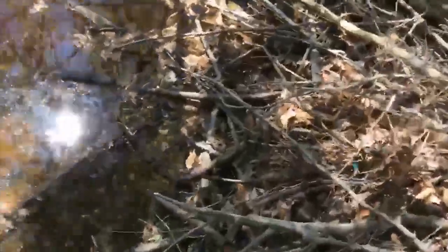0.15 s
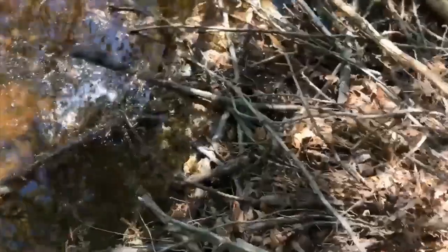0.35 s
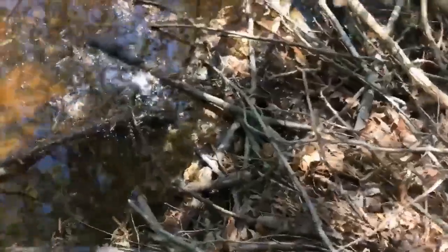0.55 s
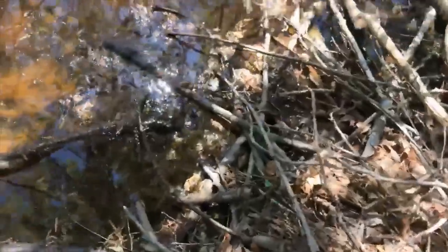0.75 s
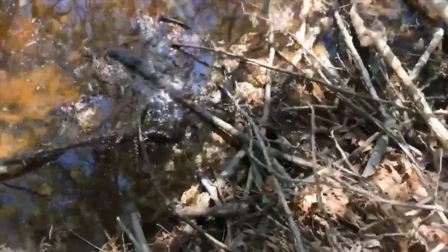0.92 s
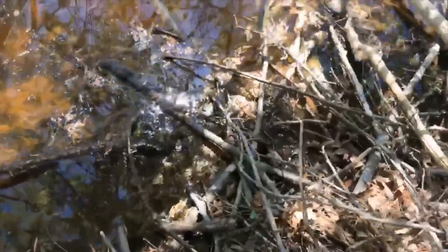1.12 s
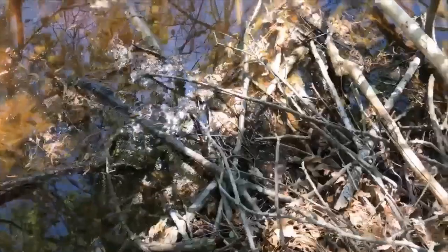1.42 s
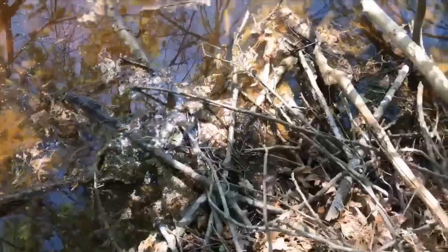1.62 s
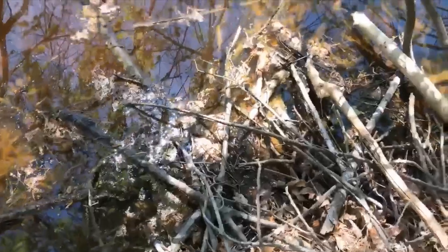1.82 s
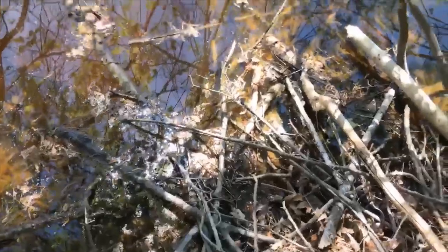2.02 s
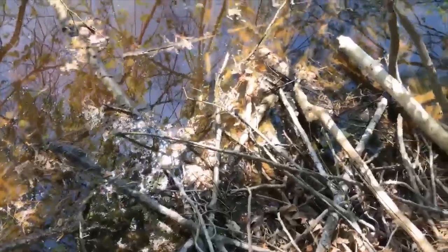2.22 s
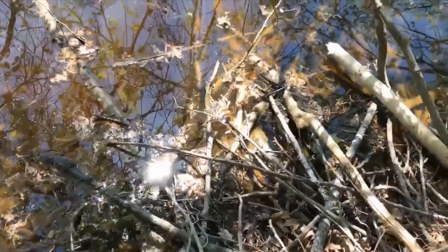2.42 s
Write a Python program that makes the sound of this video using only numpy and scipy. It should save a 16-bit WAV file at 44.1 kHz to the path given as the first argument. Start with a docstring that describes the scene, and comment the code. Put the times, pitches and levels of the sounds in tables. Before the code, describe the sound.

A footstep crushes dry leaves and twigs in one long, bright, crackling crunch with two hard snaps, then faint rustling and scattered ticks fade out on a quiet stream bank; close mono microphone, low distant rumble beneath.

```python
"""On a stream bank, a foot presses into dry leaves and twigs: one long crunch, then the litter shifts and settles.
Leaves crackle as dense random impulses exciting damped resonators; tears and rubbing are modulated noise.
Twigs snap as damped sines with a noise crack; thicker sticks knock as two damped modes with a scuff.
A low far rumble of filtered noise lies underneath. Mono microphone."""
import sys
import numpy as np
from scipy import signal
from scipy.fft import rfft, irfft
from scipy.io import wavfile

SR = 44100
rng = np.random.default_rng(int(sys.argv[2]) if len(sys.argv) > 2 else 0)


def to_wav(sig):
    """Store sig (one row per channel, or 1-D mono) as 16-bit WAV at the path in sys.argv[1].

    Samples outside -1..1 are clipped; the rate is SR.
    """
    pcm = np.clip(np.atleast_2d(sig), -1, 1) * 32767
    pcm = np.round(pcm).astype(np.int16)
    wavfile.write(sys.argv[1], SR, pcm.T)  # frames by channels


N = 112454

# Rustle over time, level and treble tilt: [t/s, gain level/dB, tilt/(dB per octave)]
RUSTLE_LEVEL = [(0.0, -48.5, 1), (0.065, -56, 3.5), (0.075, -70, 13), (0.095, -70.5, 5), (0.109, -34.5, 0),
                (0.16, -38, 1.5), (0.18, -31.5, 0), (0.29, -33.5, 0.5), (0.4, -32, 0.5), (0.5, -34.5, -0.5),
                (0.55, -34, 1), (0.59, -38, -1.5), (0.635, -38, 1), (0.691, -32.5, 1), (0.76, -36.5, 1),
                (0.81, -42, 0), (0.851, -56, 2), (0.9, -54.5, -1), (0.96, -51, 1.5), (1.2, -49.5, 0),
                (1.3, -45, 0), (1.43, -48.5, -1), (1.48, -55, -0.5), (1.52, -49, 3), (1.62, -57, 0),
                (1.8, -48, -2), (1.93, -56.5, -0.5), (1.97, -66, -0.5), (2.015, -58.5, -2.5),
                (2.035, -44.5, 1.5), (2.06, -61, -2), (2.09, -53, -0.5), (2.14, -67.5, 0), (2.35, -72, -6),
                (2.38, -76, -4), (2.47, -67, -6.5), (2.55, -75, -2)]
# Snaps of twigs and stiff leaves:
# [t/s, level/dB, f/Hz, ring/cycles to -60 dB, crack level/dB re ring, crack tilt/(dB per octave)]
TWIG_SNAPS = [(0.1091, -20.5, 6500, 17, -5.5, -1), (0.1273, -18, 3870, 13.5, -7, -0.5),
              (0.1798, -22, 4300, 12.5, -11, 0), (.2174, -23, 6600, 14, -12, 2),
              (0.2566, -17, 4160, 12, -7, -3), (.2664, -22, 6300, 15, -8, 3.5),
              (.3042, -18.5, 8600, 15, -6.5, 0), (.3486, -9.5, 6500, 11, -17, 3),
              (0.3612, -22, 8630, 14, -12, 4), (0.3712, -18, 8400, 15, -8, 4),
              (0.4057, -20.5, 4160, 15, -7, 0), (0.4246, -20.5, 4400, 12, -8, -1),
              (0.4365, -19, 2550, 13, -9, 0), (0.4436, -20.5, 4060, 10, -14, -2),
              (0.5134, -19.5, 4100, 13, -8, 0), (0.5466, -23, 4600, 12, -4, 3),
              (0.6072, -6, 4260, 6.5, -12.5, -2), (0.6141, -14.5, 8850, 20, -5.5, 2),
              (.6174, -22, 3240, 14, -4, 2), (.6604, -23, 5120, 10, -7.5, -2),
              (.7615, -23, 14500, 20, -5, 3), (0.8986, -32, 12500, 20, -6, 1.5),
              (0.9142, -36.5, 6000, 15, -7, 0), (0.9714, -38, 4100, 12, -8, 0),
              (1.069, -29.5, 12600, 19, -6, 1.5), (1.1478, -38.5, 3890, 9, -6, -3),
              (1.1872, -34.5, 4300, 9, -6, -3), (1.2024, -34.5, 5720, 12, -8, -2),
              (1.2825, -30.5, 4590, 16, -6, 1), (1.2934, -34, 6500, 14, -8, 0),
              (1.3244, -34, 8960, 14, -12, -1), (1.3484, -28, 8400, 13, -14, 3),
              (1.4272, -32, 4600, 12, -5, 3.5), (1.4484, -36, 4660, 11.5, -8, 3),
              (1.494, -38, 8480, 14, -8, 0), (1.5024, -33.5, 12800, 15, -8.5, 0),
              (1.5124, -36, 8000, 17, -10, -2.5), (1.6671, -37.5, 4640, 17, -7.5, 1),
              (1.7205, -37.5, 4740, 14, -9, 0), (1.7454, -42, 5170, 14, -8, 0),
              (1.7599, -36, 13000, 20, -5, 2), (1.7833, -22.5, 2280, 10, -13.5, -1.5),
              (1.789, -32, 6050, 14, -5, 1), (1.8174, -38, 5140, 14, -7, 0),
              (1.8262, -27.5, 5350, 17, -11.5, 3), (1.8344, -39, 3580, 14, -3, 0),
              (1.8464, -39, 5100, 14, -2, 5), (1.8814, -42, 6130, 13, -6, 0),
              (1.9006, -27, 5570, 19, -5.5, 0.5), (1.924, -43, 4550, 10, -8, 3),
              (1.942, -33, 14200, 25, -6.5, 2.5), (1.9839, -46, 3110, 12, -6, -1),
              (2.0009, -43, 2390, 11, -5.5, -2), (2.0692, -21, 10100, 25, -5, 1.5),
              (2.159, -48, 6490, 18, -7, 0), (2.1744, -50, 15000, 25, -8, 3),
              (2.1899, -53, 9000, 15, -3, 3), (2.2268, -47, 4840, 12, -2, 1),
              (2.2654, -56, 3190, 12, -8, 0), (2.2764, -55, 5970, 14, -6, 0), (2.2832, -50, 1960, 6, -4, 1),
              (2.2967, -48.5, 8740, 18, -4.5, 2), (2.3441, -45, 6030, 14, -3, 1.5),
              (2.4044, -46.5, 3080, 10, -8.5, -4.5), (2.4474, -42.5, 5000, 12, -9, -2),
              (2.4578, -32, 4640, 6.5, -11.5, -3), (2.4664, -52, 4390, 14, -4, 0),
              (2.5014, -53, 3000, 12, -5, 0), (2.5107, -47.5, 7000, 15, -6, 0),
              (2.5287, -53, 3400, 12, -5, -1)]
# Knocks of thicker sticks: [t/s, level/dB, f/Hz, ring T60/s]
STICK_KNOCKS = [(.109, -33, 950, 0.026), (.18, -37.5, 322, 0.039), (.196, -35.5, 700, 0.017),
                (.236, -32.5, 510, 0.028), (.35, -34.5, 300, 0.023), (.398, -40, 293, 0.023),
                (.4, -28, 960, .017), (.453, -36, 1230, .014), (.537, -24, 1080, .018),
                (.571, -41, 990, 0.018), (.661, -42, 1260, .015), (1.281, -52, 900, .02),
                (1.4, -45, 860, 0.019), (2.0, -48.5, 930, 0.021)]
# Colour of leaves and microphone: [f/Hz, relative spectral density level/dB]
LEAF_SPECTRUM = [(150, -12), (250, -20.5), (292, -12.5), (519, -24.5), (586, -15.5), (922, -10.5),
                 (1330, -8), (4340, 0), (4900, -3.5), (6470, -1), (7570, -4.5), (8850, -1), (10400, -6.5),
                 (15200, -2.5), (16000, -13)]
# Colour of far rumble and air: [f/Hz, relative spectral density level/dB]
FAR_SPECTRUM = [(21, -31), (36, 0.5), (55, 1.5), (90, 0.5), (130, -8.5), (204, -12), (400, -21.5),
                (560, -20.5), (769, -21.5), (1040, -21), (1830, -33.5), (4000, -46), (16000, -47)]

# Fractures: base rate, before density and clumping act on it
GRAINS_PER_S, GRAIN_SPREAD_DB, GRAIN_CYCLES, CLUMP_DB, GRAIN_DB = 2200, 5.2, 4.6, 1.1, -2
# Tears: base rate, before density acts on it
TEARS_PER_S, TEAR_SPREAD_DB, TEAR_T60_S, TEAR_DB = 300, 3.5, 0.011, -9
RUB_DB, RUB_FLICKER_DB, RUSTLE_PATCH_DB = -5.5, 0.87, 1.7
DENSITY_FOLLOWS = 0.45  # share of the level's swing, in dB, by which fractures and tears grow denser
TILT_PIVOT_HZ = 4100
# Snaps: the undertone is a ratio to the ring's pitch
SNAP_LAG_S, UNDERTONE_RATIO, UNDERTONE_DB, SNAP_LOW_CUT_HZ = 0.0012, 0.48, -9.5, 1450
CRACK_T60_S, TAIL_DB, TAIL_T60_S = 0.0078, -30, 0.081
# Knocks: the overtone is a ratio to the knock's pitch
KNOCK_LAG_S, KNOCK_RISE_S, OVERTONE_RATIO, OVERTONE_DB, SCUFF_DB = 0.00197, 0.00075, 1.437, -5, -2.5
FAR_DB, FAR_PATCH_DB = -56, 0.5
RUMBLE_CUT_HZ, TOP_CUT_HZ = 34.6, 15850


def from_db(db):
    """Level relation: amplitude gain is ten to the power level/20."""
    return 10 ** (np.asarray(db) / 20)


def rms_one(x):
    """Normalisation: divide by the root mean square."""
    return x / np.sqrt(np.mean(x ** 2) + 1e-20)


def at_hz(points, hz):
    """Linear interpolation of level on a logarithmic frequency axis."""
    table_hz, table_db = np.array(points).T
    return np.interp(np.log(hz), np.log(table_hz), table_db)


def colour(x, points):
    """Linear filtering: multiply the spectrum by the gains of a table."""
    hz = np.maximum(np.arange(N // 2 + 1) * SR / N, 1)
    return irfft(rfft(x) * from_db(at_hz(points, hz)), N)


def drift(rate_hz):
    """Random modulation: low-passed noise of unit spread, made at SR / 20 and interpolated."""
    r = np.exp(-40 * np.pi * rate_hz / SR)
    slow = signal.lfilter([1], [1, -2 * r, r * r], rng.standard_normal(N // 20 + 2002))
    slow = slow[2000:]  # leave out the filter's start
    return np.interp(np.arange(N) / 20, np.arange(len(slow)), rms_one(slow - slow.mean()))


def decay(t, t60):
    """Exponential damping: 60 dB of fall in T60, which is at least 0.5 ms."""
    return from_db(-60 * t / max(t60, 5e-4))


def add(out, start_s, sound):
    """Superposition: add a short sound at its time."""
    i = int(start_s * SR)
    out[i:i + len(sound)] += sound[:len(out) - i]


def half_octave_bands(pair, patch_db, rate_hz, tilt_db=0):
    """Band-wise modulation: each half octave has its own wavering gain and its share of the tilt."""
    out = 0
    edges = 22 * 2 ** np.arange(0, 10, 0.5)
    for k, (low, high) in enumerate(zip(edges, edges[1:])):
        sos = signal.butter(2, [low, high], "band", fs=SR, output="sos")
        band = signal.sosfilt(sos, pair[k % 2])  # neighbouring bands draw on different signals
        out = out + band * from_db(patch_db * drift(rate_hz) + tilt_db * np.log2(low / TILT_PIVOT_HZ))
    return out


def fractures(density):
    """Impulse excitation: clumped random clicks drive 16 damped resonators, each ringing a few cycles."""
    sizes = from_db(GRAIN_SPREAD_DB * np.minimum(rng.exponential(1, N), 4)) * rng.choice([-1, 1], N)
    rate = density * GRAINS_PER_S * from_db(CLUMP_DB * drift(40))
    clicks = sizes * (rng.random(N) < rate / SR)
    dealt = rng.integers(0, 16, N)  # resonator that each click excites
    grains = np.zeros(N)
    for k, hz in enumerate(np.geomspace(300, 15000, 16)):
        r = from_db(-60 * hz / (GRAIN_CYCLES * SR))
        w = 2 * np.pi * hz / SR
        poles = [1, -2 * r * np.cos(w), r * r]
        ringing = signal.lfilter([1, 0, -1], poles, clicks * (dealt == k) + 1e-18)
        grains += hz / SR * ringing / np.sin(w)
    return rms_one(grains / np.sqrt(density))  # offset the power gained from density


def tears(density):
    """Shot process: random starts of unequal size, each with an exponential fall, form an envelope."""
    sizes = from_db(TEAR_SPREAD_DB * np.minimum(rng.exponential(1, N), 3))
    starts = (rng.random(N) < density * TEARS_PER_S / SR) * sizes
    poles = [1, -decay(1 / SR, TEAR_T60_S)]
    return rms_one(signal.lfilter([1], poles, starts / np.sqrt(density) + 1e-18))


def rustle():
    """Modulated noise: fractures, with tearing and rubbing hiss, follow the rustle's level curve."""
    times_s, level_points, tilt_points = np.transpose(RUSTLE_LEVEL)
    t = np.arange(N) / SR
    level_db = np.interp(t, times_s, level_points)
    tilt_db = np.interp(t, times_s, tilt_points)
    density = from_db(DENSITY_FOLLOWS * (level_db - level_db.mean()))
    grains = from_db(GRAIN_DB) * fractures(density)
    hiss_gain = from_db(RUB_DB + RUB_FLICKER_DB * drift(25)) + from_db(TEAR_DB) * tears(density)
    pair = grains + hiss_gain * rng.standard_normal((2, N))  # same grains, two noises
    banded = half_octave_bands(pair, RUSTLE_PATCH_DB, 19.0, tilt_db)
    return from_db(level_db) * rms_one(colour(banded, LEAF_SPECTRUM))


def snaps():
    """Damped free vibration: a ring at the twig's pitch, a lower mode, a broadband crack and a faint noise tail."""
    t = np.arange(4096) / SR
    bins_hz = np.maximum(np.arange(len(t) // 2 + 1) * SR / len(t), 100)
    leaf_db = at_hz(LEAF_SPECTRUM, bins_hz)
    octaves = np.log2(bins_hz / TILT_PIVOT_HZ)
    fall = decay(t, CRACK_T60_S) + from_db(TAIL_DB) * decay(t, TAIL_T60_S)
    out = np.zeros(N)
    for start_s, level_db, hz, cycles, crack_db, tilt_db in TWIG_SNAPS:
        undertone = from_db(UNDERTONE_DB) * np.sin(2 * np.pi * UNDERTONE_RATIO * hz * t)
        ring = (np.sin(2 * np.pi * hz * t) + undertone) * decay(t, cycles / hz)
        spectrum = rfft(rng.standard_normal(len(t))) * from_db(leaf_db + tilt_db * octaves)
        crack = from_db(crack_db) * rms_one(irfft(spectrum)) * fall
        add(out, start_s + SNAP_LAG_S, from_db(level_db) * (ring + crack))
    return signal.sosfilt(signal.butter(4, SNAP_LOW_CUT_HZ, "high", fs=SR, output="sos"), out)


def knocks():
    """Modal vibration: two damped wood modes and a dull scuff round their pitch, with a soft start."""
    t = np.arange(6000) / SR
    out = np.zeros(N)
    for start_s, level_db, hz, t60 in STICK_KNOCKS:
        overtone = from_db(OVERTONE_DB) * np.sin(2 * np.pi * OVERTONE_RATIO * hz * t)
        modes = np.sin(2 * np.pi * hz * t) + overtone
        sos = signal.butter(2, [hz / 1.37, hz * 2], "band", fs=SR, output="sos")
        scuff = from_db(SCUFF_DB) * rms_one(signal.sosfilt(sos, rng.standard_normal(len(t))))
        shape = (1 - np.exp(-t / KNOCK_RISE_S)) * decay(t, t60)
        add(out, start_s + KNOCK_LAG_S, from_db(level_db) * (modes + scuff) * shape)
    return out


def distance():
    """Filtered noise: a nearly steady far rumble with a little air above it."""
    banded = half_octave_bands(rng.standard_normal((2, N)), FAR_PATCH_DB, 3.3)
    return from_db(FAR_DB) * rms_one(colour(banded, FAR_SPECTRUM))


def scene():
    """Superposition: the sum of all sources, the same in both channels."""
    return np.tile(rustle() + snaps() + knocks() + distance(), (2, 1))


def record(dry):
    """Band limitation: the microphone drops the deepest bass; the top is cut steeply."""
    dry = signal.sosfilt(signal.butter(4, RUMBLE_CUT_HZ, "high", fs=SR, output="sos"), dry)
    return signal.sosfilt(signal.ellip(12, 0.5, 75, TOP_CUT_HZ, fs=SR, output="sos"), dry)


dry = scene()
out = record(dry)
to_wav(out)
```